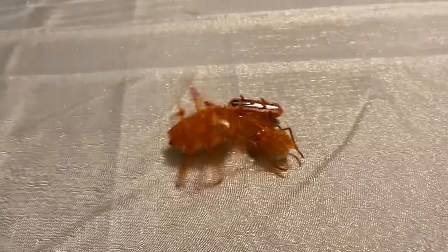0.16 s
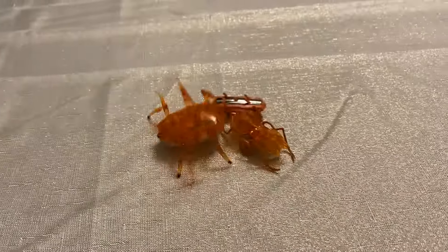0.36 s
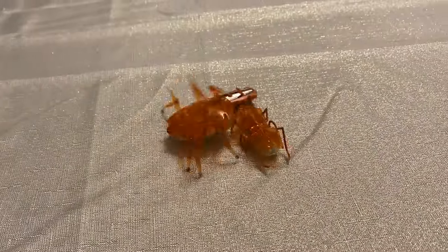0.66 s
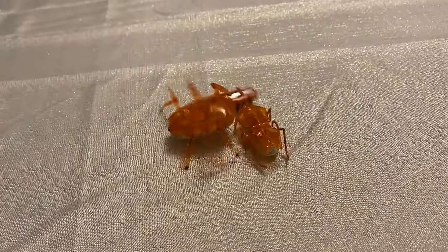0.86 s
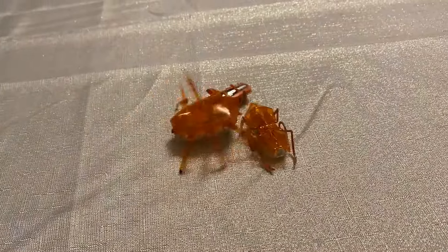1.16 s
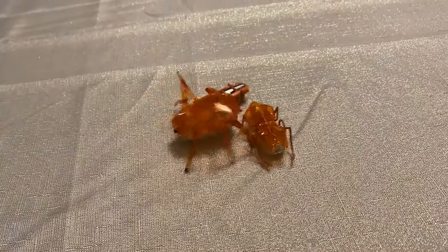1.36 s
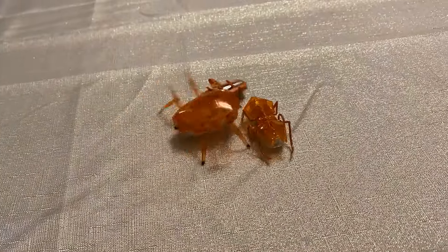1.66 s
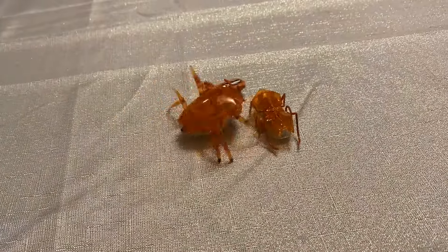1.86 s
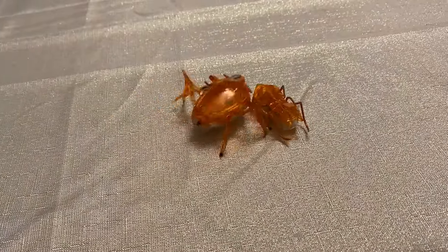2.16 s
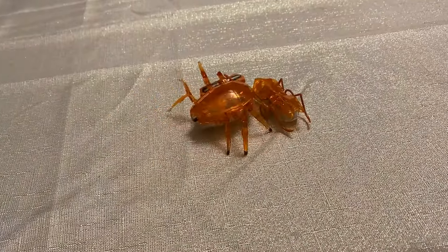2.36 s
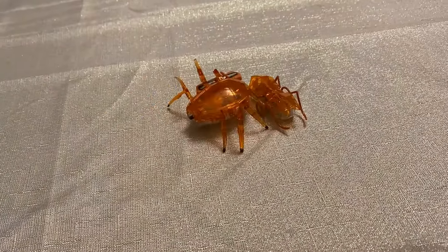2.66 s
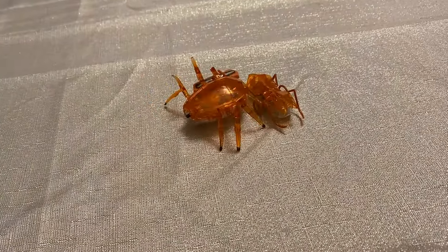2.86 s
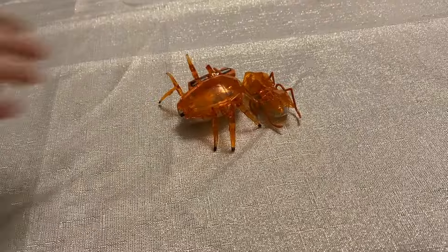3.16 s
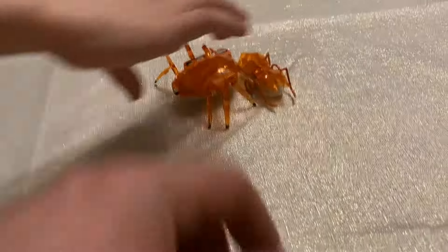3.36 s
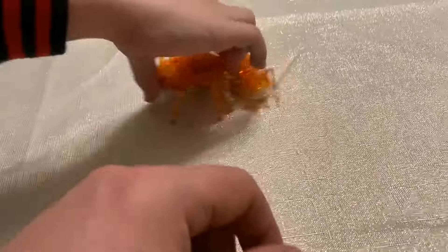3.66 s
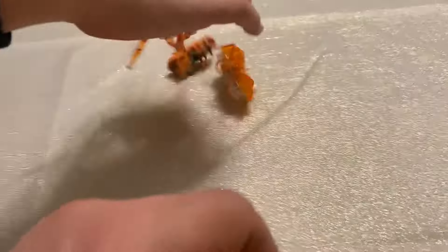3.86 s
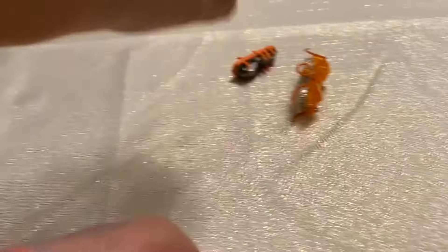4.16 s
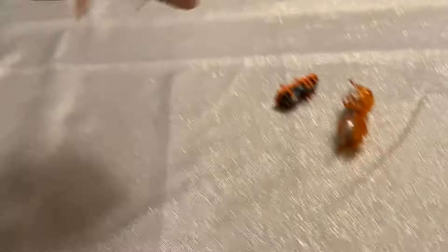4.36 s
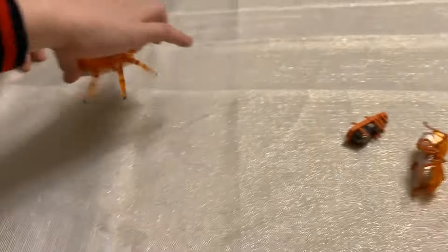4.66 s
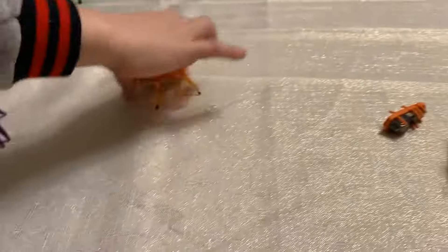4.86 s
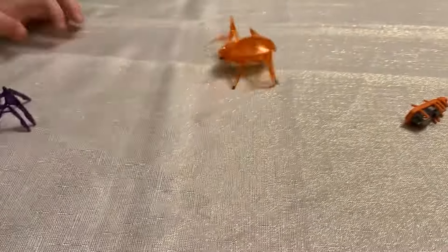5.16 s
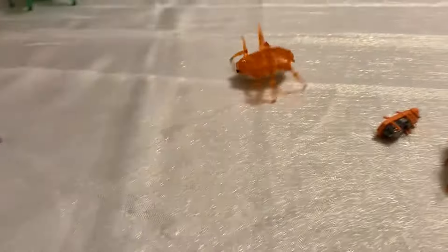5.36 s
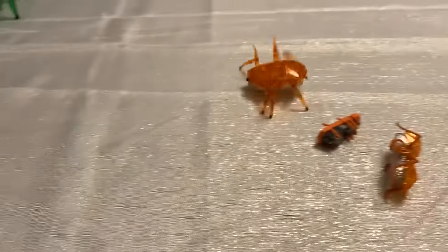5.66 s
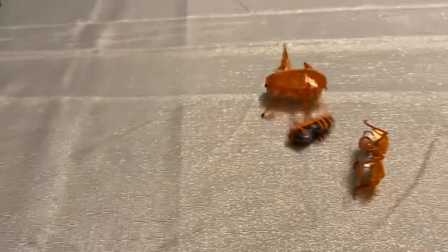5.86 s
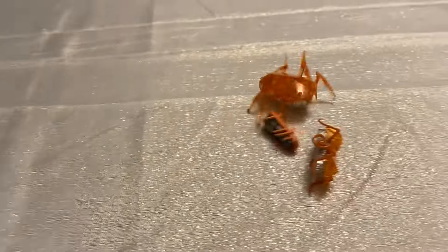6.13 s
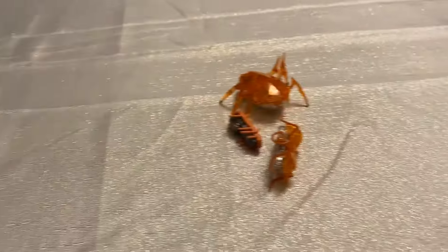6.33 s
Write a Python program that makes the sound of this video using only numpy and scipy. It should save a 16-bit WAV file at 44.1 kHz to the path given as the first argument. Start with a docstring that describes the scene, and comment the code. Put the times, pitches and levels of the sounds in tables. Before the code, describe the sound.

A small motorized toy bug rasps and buzzes on a cloth-covered table, feet pattering and plastic ticking. The buzz stops; only faint fabric rustle and dull breathy noise remain. A hand clacks the toy, it starts again with a thin wavering squeal while lifted, is set down tapping steadily, then clicks off. Close handheld microphone, small room.

```python
"""Toy robot bug on a table

A toy robot bug walks over a cloth-covered table and pushes against another toy: noisy tooth scrapes make the
rasp of its plastic gears, noise snaps ring its shell, and taps ring the modes of the board.
It stops, a hand knocks it while picking it up, it runs in the air with a thin squeal of the axle (a gliding
resonance), walks again and clicks off. Fabric swishes, a faint dull breathy noise fills the pause, and a
hand-held camera rumbles softly in a small room."""
import sys
import numpy as np
from scipy import signal
from scipy.fft import rfft, irfft, next_fast_len
from scipy.io import wavfile
from scipy.ndimage import uniform_filter1d, map_coordinates

SR = 44100
rng = np.random.default_rng(int(sys.argv[2]) if len(sys.argv) > 2 else 0)


def store_pcm(level_fs):
    """Save levels as 16-bit WAV."""
    pcm = np.round(np.clip(level_fs, -1, 1) * 32767).astype(np.int16)
    wavfile.write(sys.argv[1], SR, np.atleast_2d(pcm).T)


N = 286297
TIME = np.arange(N) / SR
TOP_HZ = 15900  # nothing sounds above this

# Levels in the tables come before the trims in the functions; spectra and modes give relative levels.

# effort of the gear train, one list a run: (t/s, rasp level/dB, tooth sizzle level/dB)
GEAR_RUNS = [
    [(0.0, -49, -44.5), (0.2, -52.5, -48.5), (0.62, -50.5, -45.5), (0.8, -52.5, -46.5), (1.15, -53, -50),
     (1.7, -54, -48.5), (2.1, -53.5, -48.5), (2.305, -54, -50)],
    [(3.698, -57, -53), (3.8, -56, -51), (4.1, -59.5, -50.5), (4.4, -56, -50.5), (4.6, -54.5, -48),
     (4.79, -52.5, -54), (4.85, -55, -52.5), (4.97, -54.5, -52.5), (5.7, -54, -52.5), (6.121, -53.5, -53.5)],
]
# colour of the gear rasp and of the fine tooth sizzle: (f/Hz, level/dB per Hz)
RASP_COLOUR = [(150, -3.5), (400, 0.5), (700, -3.5), (920, -0.5), (1150, -0.5), (1400, -0.5), (1980, 1.6),
               (2270, -6), (2650, -4.5), (3100, 2), (4300, 0), (6200, 0), (7300, 2), (8300, -4.5),
               (10000, -56), (16000, -32)]
SIZZLE_COLOUR = [(3000, -40.5), (6000, -40), (7300, -5), (8500, -0.5), (10400, 4.5), (11400, 7),
                 (12400, 3.5), (14500, 3.5), (15800, 0)]
# main body resonance, shifting as the hand grips and turns the toy: (t/s, f/Hz, level/dB)
HOLLOW_BODY = [(0, 3790, -60), (2.3, 3680, -64), (3.75, 3720, -66), (3.97, 3350, -49.5), (4.08, 3670, -61),
               (4.2, 3550, -58.5), (4.31, 3690, -47), (4.42, 3794, -62.5), (4.55, 3530, -55.5),
               (4.72, 3860, -57), (4.85, 3650, -70), (4.97, 3550, -59.5), (5.8, 3610, -60),
               (6.1, 3400, -55)]
# legs ringing along while the toy stands on the table: (t/s, level/dB re rasp)
STANDING_LEGS = [(0, -20), (1.0, -20), (2.3, -14), (3.7, -45), (4.75, -34), (4.95, -10), (5.5, -11.5),
                 (6.1, -11.5)]
LEG_RING_HZ = 1836
# shell mode, muted until the toy is pulled free of the other: (t/s, level/dB re rasp)
FREE_SHELL = [(3.8, -38), (4.9, -14.5)]
FREE_SHELL_HZ = 2450
# a leg slips free of the other toy and unloads the gears: (t/s, depth/dB)
LEG_SLIPS = [(0.708, 6.5), (0.893, 2), (1.106, 6), (1.335, 4), (1.533, 3), (1.739, 13.5), (1.946, 9),
             (2.178, 9.5)]
SLIP_DROP_S, SLIP_RELOAD_S = 0.012, 0.055  # quick fall of the load, slower rebuild
# gears easing after a footfall: delay, depth, half width
SLACK_AFTER_STEP_S, STEP_SLACK_DB, STEP_SLACK_S = 0.081, 2, 0.013
FULL_STEP_DB = -45  # a footfall that carries the whole toy
# squeals of the dry axle in the air: (t/s, length/s, level/dB, first f/Hz, last f/Hz)
AXLE_SQUEALS = [(3.766, 0.083, -56, 7540, 6800), (3.893, 0.084, -46.5, 7400, 7540),
                (4.005, 0.077, -47, 6900, 6660), (4.072, 0.096, -42, 7660, 7100),
                (4.207, 0.062, -42.5, 7760, 7600), (4.335, 0.14, -46, 6960, 7800),
                (4.47, 0.11, -43.5, 6860, 7760), (4.606, 0.12, -42.5, 7070, 7900),
                (4.885, 0.028, -47, 7350, 7300)]
SQUEAL_FADE_S = 0.033  # attack and release
# axle rubbing on between squeals, less once the feet carry the toy: (t/s, level/dB)
AXLE_RUB = [(3.762, -46), (3.93, -48), (4.3, -48.5), (4.77, -44.5), (4.86, -53.5), (5.25, -48.5),
            (5.5, -53), (6.121, -53)]
AXLE_RUB_HZ = 7090
# feet and body knocking on the table:
# (t/s, peak level/dB, scuff level/dB, chatter level/dB, second foot delay/s, its level/dB re the first)
FOOT_TAPS = [(0.012, -37.5, -2, -22.5, 0.013, -4), (0.151, -37, 0, -22.5, 0.01, 0),
             (0.298, -40.5, 6, -13.5, 0.017, 1), (0.443, -33.5, 7, -24, 0.013, 2.5),
             (0.609, -36.5, 2, -25, 0.008, 0), (0.794, -44, -2, -22, 0.01, 1),
             (1.895, -49.5, 3, -29, 0.011, 3), (2.08, -51.5, 18, -31, 0.0078, -1),
             (3.821, -37, 4, -26, 0.008, -0.5), (3.874, -41.5, -16, -21.5, 0.007, -1),
             (4.769, -36.5, 9, -26, 0.017, 5.5), (4.938, -29.5, -23, -32, 0.007, -16),
             (5.074, -31.5, -8, -31, 0.0069, -15), (5.209, -32, -1, -30.5, 0.012, -10),
             (5.346, -38.5, -6, -25, 0.0093, -6), (5.62, -38, -12, -20.5, 0.009, 3),
             (5.754, -37, 0, -24, 0.011, -1), (5.894, -32.5, 2.5, -29.5, 0.011, -4),
             (6.063, -42.5, -6, -22, 0.0085, -1.5)]
# modes of the table board: (f/Hz, width/Hz, level/dB)
BOARD_MODES = [(173, 123, -10), (270, 77, -3), (404, 29, 2.5), (532.4, 36.5, 3), (621, 92, -3),
               (877, 260, -3.5), (1190, 200, -17)]
# scuff of a foot: (f/Hz, level/dB per Hz)
SCUFF_COLOUR = [(700, -5), (1300, 10.5), (1900, -4.5), (2350, -2), (2800, -8), (4000, -2), (8000, -55)]
# loudest snaps of the plastic legs and the switch: (t/s, shell level/dB, edge level/dB)
PLASTIC_TICKS = [(0.032, -43, -45.5), (0.1127, -56, -33.5), (0.157, -38.5, -48), (0.2043, -38, -47),
                 (0.2107, -38, -41.5), (0.24, -46, -50), (0.2515, -43, -35), (0.272, -44, -49),
                 (0.428, -35, -35.5), (0.592, -44.5, -39), (0.8887, -55.5, -34), (0.95, -46, -55),
                 (1.0271, -43, -52), (1.1048, -48, -38), (1.526, -38.5, -42), (1.7296, -44, -43),
                 (1.939, -51, -37.5), (2.1739, -39.5, -40), (2.28, -50, -52), (3.0842, -66, -71),
                 (3.359, -68.5, -80), (3.465, -59, -59.5), (3.4746, -51, -56), (3.483, -62, -67),
                 (3.681, -46, -65), (3.762, -52, -37), (3.766, -41, -32.5), (3.769, -42, -35),
                 (3.8056, -46, -48.5), (3.82, -38, -27), (3.827, -37, -37), (3.8556, -40, -50),
                 (4.1497, -41.5, -58), (4.203, -48, -34.5), (4.2221, -44.5, -40), (4.313, -41.5, -41),
                 (4.409, -38.5, -39.5), (4.4453, -44, -44), (4.5448, -43, -45), (4.652, -53, -42),
                 (4.7057, -52, -38), (4.737, -41, -34), (4.788, -38, -59), (5.033, -49.5, -39),
                 (5.167, -55, -44), (5.303, -58, -36.5), (5.441, -52, -37), (5.7108, -53, -36.5),
                 (6.129, -34.5, -27.5), (6.1763, -46, -62)]
# modes of the plastic shell: (f/Hz, width/Hz, level/dB)
SHELL_MODES = [(2070, 190, -7), (3300, 255, -34.5), (3860, 300, -3), (4830, 1100, -3.5)]
# shell scraping against fingers and the other toy: (t/s, length/s, level/dB)
SHELL_SCRAPES = [(2.27, 0.034, -50.5), (3.43, 0.024, -77), (3.455, 0.04, -68), (3.541, 0.03, -57),
                 (3.575, 0.046, -51.5), (3.82, 0.075, -53)]
# modes of the scraped shell: (f/Hz, width/Hz, level/dB)
SCRAPED_MODES = [(3320, 710, 1), (4040, 520, 2.5), (5400, 1200, -4.5), (7400, 1200, -8)]
# hand bumping the toy against the table: (t/s, peak level/dB, hard upper modes level/dB re peak)
HAND_BUMPS = [(3.52, -32.5, 3.5), (3.544, -46, 18), (3.551, -40, 5), (3.56, -39, 10), (3.5665, -23, 0),
              (3.591, -36.5, 1), (3.606, -42, -11)]
# low and hard upper modes of a bump: (f/Hz, width/Hz, level/dB)
THUMP_MODES = [(200, 65, 1), (288, 127, 1), (563, 56, 10.5), (1170, 38, -1)]
CLACK_MODES = [(915, 250, -12), (1400, 400, -7), (1920, 350, -3), (2320, 125, 6), (3320, 330, -7.5)]
# sleeve, fingers and feet brushing over the cloth: (t/s, length/s, level/dB)
CLOTH_BRUSHES = [(2.58, 0.125, -71.5), (2.81, 0.089, -79), (3.018, 0.03, -77), (3.224, 0.078, -54.5),
                 (3.282, 0.12, -75), (3.446, 0.083, -61), (3.563, 0.057, -48.5), (4.752, 0.058, -44),
                 (5.16, 0.016, -41.5)]
# swish of fabric: (f/Hz, level/dB per Hz)
CLOTH_COLOUR = [(290, -32), (500, -2), (737, -1.5), (827, -8), (1060, -4.5), (1770, -0.5), (2760, -7),
                (15500, -8)]
# faint dull breathy noise in the pause: (t/s, level/dB)
PAUSE_NOISE = [(2.45, -86), (2.52, -70), (2.66, -74), (2.73, -104), (2.78, -99), (2.82, -68), (2.98, -79),
               (3.06, -67), (3.2, -68.5), (3.33, -65), (3.42, -85)]
# colour of the breathy noise: (f/Hz, level/dB per Hz)
PAUSE_COLOUR = [(200, 9), (700, 0.5), (1200, -3), (1900, 0), (2700, -3.5), (3400, -12), (8000, -17.5),
                (15000, -25)]
# steady unrest of the camera in the hand: (t/s, rumble level/dB, rub level/dB)
CAMERA_UNREST = [(0.0, -56, -54), (0.7, -59.5, -58), (1.1, -49.5, -52.5), (1.75, -59, -54.5),
                 (2.3, -66, -67), (2.55, -64, -61), (3.45, -61, -59.5), (4.0, -52.5, -51.5),
                 (4.25, -57.5, -57.5), (4.75, -60.5, -54), (5.0, -51.5, -49.5), (5.6, -54.5, -51),
                 (6.15, -48.5, -55.5), (6.25, -54.5, -56), (6.49, -52, -56.5)]
# camera jostled: (t/s, half width/s, rumble level/dB, rub level/dB)
CAMERA_JOSTLES = [(0.91, 0.084, -41, -47.5), (1.365, 0.021, -36.5, -42), (1.43, 0.091, -44, -42),
                  (1.73, 0.073, -53, -73), (2.5, 0.047, -55.5, -73), (2.901, 0.051, -47.5, -54),
                  (3.27, 0.044, -50.5, -52), (3.605, 0.074, -41.5, -39.5), (3.87, 0.052, -41.5, -43.5),
                  (6.0, 0.03, -42, -60.5), (6.09, 0.036, -57, -46.5)]
# colours of rumble, rub and room tone: (f/Hz, level/dB per Hz)
RUMBLE_COLOUR = [(20, -23), (35, -2), (50, 7.5), (72, 13), (105, 9), (150, -33), (300, -73)]
RUB_COLOUR = [(60, -31), (120, -0.5), (160, -5.5), (230, -8.5), (330, -13), (500, -23), (1200, -50.5)]
AIR_COLOUR = [(60, -9.5), (150, -13), (300, -13.5), (600, -16), (2000, -19.5), (4000, -39), (8000, -44),
              (15500, -70)]
# reverberation of the small room: (f/Hz, t60/s)
ROOM_T60 = [(150, 0.48), (600, 0.73), (3000, 0.53), (7000, 0.28), (15000, 0.076)]
# colour difference of the microphone pair: (f/Hz, left minus right level/dB)
PORT_DIFFERENCE = [(200, 0.5), (550, 0.5), (1000, -0.5), (1800, -4), (2500, 1), (3200, 8.5), (4000, 3),
                   (4800, 8), (6000, 4), (7300, 0), (8500, 0)]


def gears(wheel_hz=42.2, wheel_db=-0.94, catch_db=1.0, uneven_db=0.23, hollow_swing_db=1.0):
    """The teeth rasp through the body; an off-centre wheel presses them together once a turn."""
    wheel = np.sin(2 * np.pi * np.cumsum(wheel_hz * (1 + 0.063 * wobble(6.7))) / SR)
    mesh = teeth(mesh_hz=1284.4, scatter_db=2.5, scrape_s=0.00082, jitter=0.13)
    mesh = mesh * amp(wheel_db * wheel + catch_db * wobble(130))
    mesh = shifting(mesh, patchy_db=2.6)

    flutter_db = 2.6 * wobble(30)
    leg_ring = moving_ring(mesh, LEG_RING_HZ + 16 * wobble(27), half_width_hz=62)
    legs = amp(curves(STANDING_LEGS)[0] + flutter_db) * leg_ring
    shell_ring = moving_ring(mesh, FREE_SHELL_HZ + 60 * wobble(29), half_width_hz=490)
    shell = amp(curves(FREE_SHELL)[0]) * shell_ring
    bursts_db = 1.1 * wobble(110)
    rasp = amp(bursts_db) * (coloured(mesh, RASP_COLOUR) + legs + shell)
    sizzle = coloured(mesh, SIZZLE_COLOUR)

    centre_hz, hollow_db = curves(HOLLOW_BODY)
    hollow_gain = amp(hollow_db + hollow_swing_db * wobble(23))
    hollow = hollow_gain * moving_ring(mesh, centre_hz + 50 * wobble(25), half_width_hz=590)
    out = np.zeros(N)
    for run in GEAR_RUNS:
        rasp_db, sizzle_db = curves(run)
        out += running(run) * (amp(rasp_db + 2.0) * rasp + amp(sizzle_db) * sizzle + hollow)
    return out * amp(uneven_db * wobble(22) - slack())


def teeth(mesh_hz, scatter_db, scrape_s, jitter):
    """Each meeting of two gear teeth is a tiny scrape of uneven size and timing."""
    turns = np.cumsum(mesh_hz * (1 + .03 * wobble(7))) / SR
    at = np.flatnonzero(np.diff(np.floor(turns)))
    chance = rng.standard_normal((len(at), 2))
    at = np.clip(at + chance[:, 0] * jitter * SR / mesh_hz, 0, N - 1).astype(int)
    blows = np.bincount(at, amp(scatter_db * chance[:, 1]) ** 2, N)
    energy = signal.lfilter([1], [1, -np.exp(-1 / (scrape_s * SR))], blows)
    return unit(np.sqrt(energy) * rng.standard_normal(N))


def slack():
    """dB by which the gears ease after each footfall (less if light) and when a leg slips free."""
    walking, blocked = 0, 0
    for s, db, *_ in FOOT_TAPS:
        weight = min(amp(db - FULL_STEP_DB), 1)
        walking = walking + weight * swell(s + SLACK_AFTER_STEP_S, STEP_SLACK_S)
    for s, db in LEG_SLIPS:
        drop = np.clip((TIME - s) / SLIP_DROP_S, 0, 1)
        blocked = blocked + db * drop * swell(s, SLIP_RELOAD_S)
    return STEP_SLACK_DB * walking + blocked


def backlash(knock_hz=88, depth_db=1.0):
    """Gain of the mechanism: unloaded in the air, the gears rattle to and fro in their play."""
    turns = np.cumsum(knock_hz * (1 + 0.216 * wobble(60))) / SR
    aloft = np.interp(TIME, [3.76, 3.84, 4.75, 4.8], [0, 1, 1, 0])
    rattle = np.sin(2 * np.pi * turns) + np.sin(4 * np.pi * turns) / 3
    return amp(depth_db * aloft * (rattle - 1.0))


def axle(half_width_hz=400, gain_db=-4.0, waver_hz=90, rub_half_width_hz=600):
    """Quick uneven slips excite a squeal; each burst glides as the load changes."""
    slips = teeth(mesh_hz=317.5, scatter_db=1.0, scrape_s=0.0011, jitter=0.2)
    waver = waver_hz * wobble(40)
    rub_gain = running(AXLE_RUB) * amp(curves(AXLE_RUB)[0] + 1.2 * wobble(25))
    rub = rub_gain * moving_ring(slips, AXLE_RUB_HZ + waver, rub_half_width_hz)
    level, centre_hz = np.zeros(N), np.full(N, float(AXLE_RUB_HZ))
    for s, length, db, first_hz, last_hz in AXLE_SQUEALS:
        start, end = s - SQUEAL_FADE_S / 2, s + length + SQUEAL_FADE_S / 2
        level += amp(db) * np.clip(np.minimum(TIME - start, end - TIME) / SQUEAL_FADE_S, 0, 1)
        glide_hz = np.interp(TIME, [s, s + length], [first_hz, last_hz])
        centre_hz = np.where(TIME > start, glide_hz, centre_hz)
    squeal = level * shifting(moving_ring(slips, centre_hz + waver, half_width_hz), patchy_db=6.0)
    return amp(gain_db) * (rub + squeal)


def taps(chatter_t60=0.24, chatter_rise_s=0.0044, chatter_swing_db=3.5, bounce_db=-5, bounce_s=.032,
         place=0.011, thud_db=-15.5):
    """Two feet land and bounce, then the toy chatters; each spot of the table rings a little differently."""
    out, t = np.zeros(N), np.arange(SR // 4) / SR
    for s, db, scuff_db, chatter_db, second_s, second_db in FOOT_TAPS:
        chatter = amp(chatter_db + 4.5 - 60 * t / chatter_t60) * (1 - np.exp(-t / chatter_rise_s))
        chatter *= rng.standard_normal(len(t))
        # the chatter comes in bursts, about one a bounce
        chatter *= amp(chatter_swing_db * np.cos(2 * np.pi * t * rng.uniform(0.89, 1.15) / bounce_s))
        chatter[int(bounce_s * rng.uniform(.75, 1.15) * SR)] += amp(bounce_db)
        blow = softened(chatter, hz=647)
        blow[round(.002 * SR)] += 1
        blow[round((.002 + second_s) * SR)] += amp(second_db)

        wood = ring(blow, detuned(BOARD_MODES, place))
        thud = ring(blow, [(113.0, 7.9, 0)])
        scuff_shape = amp(-60 * t / 0.044) * (1 - np.exp(-t / 0.0024))
        scuff = coloured(scuff_shape * rng.standard_normal(len(t)), SCUFF_COLOUR)
        for part, level in [(wood, 1), (thud, thud_db), (scuff, scuff_db - 8.0)]:
            add(out, s, amp(db + level) * part / np.abs(part).max())
    return out


def ticks(snap_t60=0.018, rise_s=0.00069, ring_db=1.5):
    """Hard plastic snaps: shell modes, a bright ring and a sharp edge."""
    out, t = np.zeros(N), np.arange(SR // 16) / SR
    since = t - .003  # leaves room for a short fade-in before the snap
    shape = np.where(since < 0, np.exp(-np.abs(since) / rise_s), amp(-60 * np.abs(since) / snap_t60))
    for s, shell_db, edge_db in PLASTIC_TICKS:
        snap = shape * rng.standard_normal(len(t))
        shell = ring(snap, SHELL_MODES)
        bright = ring(snap, [(8430, 1900, 0)])
        edge = ring(snap, [(9500, 5700, 0.3), (14300, 8300, -1)])
        for part, db in [(shell, shell_db), (bright, shell_db + ring_db), (edge, edge_db)]:
            add(out, s - .002, amp(db - 17.5) * unit(part))
    return out


def scrapes():
    """Plastic rubbing on plastic sticks and slips in a dense crunch that rings the shell."""
    return strokes(SHELL_SCRAPES) * unit(ring(contacts(N, per_s=1100), SCRAPED_MODES))


def bumps(rattle_db=-39, rattle_t60=0.056, grip=0.025, clatter_db=-21, clatter_t60=0.048):
    """Each bump rings a low thump and clatters the loose plastic; the changing grip detunes both."""
    out, t = np.zeros(N), np.arange(SR // 4) / SR
    for s, db, hard_db in HAND_BUMPS:
        blow = amp(rattle_db - 60 * t / rattle_t60) * rng.standard_normal(len(t))
        blow[0] += 1
        clatter = blow + amp(clatter_db - 60 * t / clatter_t60) * contacts(len(t), per_s=700)
        layers = [(blow, THUMP_MODES, 0), (softened(clatter, hz=4500), CLACK_MODES, hard_db - 9.0)]
        for push, modes, level in layers:
            part = ring(push, detuned(modes, grip))
            add(out, s, amp(db + level) * part / np.abs(part).max())
    return out


def brushes():
    """Short soft swishes of fabric: coloured noise with a finely uneven level."""
    swish = coloured(rng.standard_normal(N) * amp(1.2 * wobble(600)), CLOTH_COLOUR)
    return strokes(CLOTH_BRUSHES) * swish


def pause_noise():
    """A faint dull breathy noise in the pause: noise and sparse grains with a shifting colour."""
    waver_db = 2 * wobble(25)
    grainy = shifting(rng.standard_normal(N) + contacts(N, per_s=500), patchy_db=3.5)
    gain = running(PAUSE_NOISE) * amp(curves(PAUSE_NOISE)[0] + waver_db)
    return gain * coloured(grainy, PAUSE_COLOUR)


def table_echo(x, gain_db=-8, delay_s=0.001703):
    """The cloth-covered table throws the sound back dully from one side, which widens it."""
    delayed = filtered(x, lambda hz: np.exp(-2j * np.pi * hz * delay_s))
    return amp(gain_db) * np.array([[1], [-1]]) * softened(delayed, hz=4940)


def room(x, count=14):
    """A diffuse tail, different at each microphone, redrawn at regular intervals and crossfaded."""
    out, step = np.zeros((2, N)), N // count + 1
    for start in range(-step, N, step):
        first = max(start, 0)
        piece = x[first:start + 2 * step]
        # overlapping sine windows crossfade one tail into the next
        piece = piece * np.sin(np.pi / 2 * (np.arange(len(piece)) + first - start) / step)
        hz, t, z = signal.stft(rng.standard_normal((2, SR // 2)), SR, nperseg=256)
        decay = amp(-60 * t / along(ROOM_T60, hz)[:, None])
        tail = signal.istft(z * decay, SR, nperseg=256)[1]
        for track, side in zip(out, tail):
            add(track, first / SR + .004, signal.fftconvolve(piece, side / np.linalg.norm(side)))
    return out


def background(unrest_db=2.0):
    """Rumble of the hand-held camera, swelling when it is jostled, over quiet room tone."""
    rumble, rub = (amp(db + unrest_db * wobble(9.8)) for db in curves(CAMERA_UNREST))
    for s, half_width, rumble_db, rub_db in CAMERA_JOSTLES:
        rumble = np.hypot(rumble, amp(rumble_db) * swell(s, half_width))
        rub = np.hypot(rub, amp(rub_db) * swell(s, half_width))
    camera = rumble * wide_noise(RUMBLE_COLOUR, side_db=-22.5) + rub * wide_noise(RUB_COLOUR, side_db=-10.5)
    air = amp(-75.0 + 0.74 * wobble(5.3)) * wide_noise(AIR_COLOUR, side_db=5.5)
    return amp(-2.5) * camera + air


def amp(db):
    """Decibels to gain."""
    return 10 ** (np.asarray(db) / 20)


def unit(x):
    """Scale to rms 1."""
    return x / np.sqrt(np.mean(x ** 2) + 1e-20)


def along(points, hz):
    """(f/Hz, value) points read on a log axis."""
    f, v = np.transpose(points)
    return np.interp(np.log(hz + 1), np.log(f), v)


def curves(rows):
    """One value per sample for each column after the time."""
    s, *cols = np.transpose(rows)
    return [np.interp(TIME, s, c) for c in cols]


def running(rows, fade=0.016):
    """1 from the first row to the last, with short fades."""
    first, last = rows[0][0], rows[-1][0]
    return np.interp(TIME, [first - fade, first, last, last + fade], [0, 1, 1, 0])


def strokes(rows):
    """Gain of (t/s, length/s, level/dB) strokes that rise, hold and fall."""
    gain = np.zeros(N)
    for s, length, db in rows:
        corners = [s, s + length / 4, s + length * 3 / 4, s + length]
        gain += amp(db) * np.interp(TIME, corners, [0, 1, 1, 0])
    return gain


def swell(s, half_width):
    """A bell of height 1 around time s, down to 1/e at the half width."""
    return np.exp(-((TIME - s) / half_width) ** 2)


def wobble(rate):
    """A smooth random curve, rate knots a second."""
    return map_coordinates(rng.standard_normal(int(N * rate / SR) + 4), [TIME * rate])


def contacts(size, per_s):
    """Tiny contacts of uneven strength at random moments, at rms 1."""
    return unit((rng.random(size) < per_s / SR) * rng.standard_normal(size))


def filtered(x, response):
    """x times a complex response of frequency."""
    n = x.shape[-1]
    m = next_fast_len(n + 8192)  # spare room keeps the end from wrapping onto the start
    return irfft(rfft(x, m) * response(np.fft.rfftfreq(m, 1 / SR)), m)[..., :n]


def coloured(x, spectrum):
    """x shaped by (f/Hz, level/dB) points, at rms 1."""
    return unit(filtered(x, lambda hz: amp(along(spectrum, hz))))


def softened(x, hz):
    """A soft contact: two-pole low-pass."""
    return filtered(x, lambda f: 1 / (1 + 1j * f / hz) ** 2)


def ring(x, modes):
    """x through (f/Hz, width/Hz, level/dB) resonances of alternating polarity."""
    def response(f):
        total = 0
        for k, (centre, width, db) in enumerate(modes):
            damping = 1j * f * width
            total = total + (-1) ** k * amp(db) * damping / (centre * centre - f * f + damping)
        return total
    return filtered(x, response)


def detuned(modes, spread):
    """The modes as one blow finds them: each slightly moved, and louder or softer by chance."""
    return [(hz * (1 + spread * rng.uniform(-1.15, 1)), width, db + 2 * rng.standard_normal())
            for hz, width, db in modes]


def moving_ring(x, centre_hz, half_width_hz):
    """A noisy excitation x narrowed to a band around a gliding centre, at rms 1."""
    turn = np.exp(2j * np.pi * np.cumsum(centre_hz) / SR)
    pole = np.exp(-2 * np.pi * half_width_hz / SR)
    # shift the centre down to 0 Hz, low-pass there, shift back up
    return unit(np.real(turn * signal.lfilter([1], np.poly([pole, pole]), x / turn)))


def shifting(x, patchy_db):
    """Small patches of the spectrum swell and fade at random."""
    z = signal.stft(x, nperseg=512)[2]
    field = uniform_filter1d(rng.standard_normal(z.shape), size=3, axis=0)
    field = uniform_filter1d(field, size=7, axis=1)
    return unit(signal.istft(z * amp(patchy_db * unit(field)), nperseg=512)[1][:N])


def wide_noise(spectrum, side_db):
    """Stereo noise: a mid of rms about 1 and an independent side at side_db relative to it."""
    mid, side = coloured(rng.standard_normal((2, N)), spectrum)
    return np.array([mid + amp(side_db) * side, mid - amp(side_db) * side])


def add(track, s, sound):
    """Mix a sound in at time s."""
    part = track[max(round(s * SR), 0):][:len(sound)]
    part += sound[:len(part)]


def scene():
    """Toy and hand are close in front of the camera; the room answers softly."""
    motor = (gears() + axle()) * backlash()
    knocks = taps()
    details = ticks() + brushes() + pause_noise() + scrapes()
    grab = bumps()
    echo = room(amp(-5) * motor + amp(-9.0) * knocks + amp(-8.0) * grab + amp(-10.5) * details)
    grab_on_left = grab * amp([[2.5], [-2.5]])
    return motor + knocks + details + grab_on_left + table_echo(motor + knocks) + echo + background()


def record(dry, treble_side_db=-2):
    """The two microphones differ in colour; the treble is slightly narrowed and lags on the left."""
    mid = dry.mean(0)
    side = filtered((dry[0] - dry[1]) / 2, lambda hz: amp(treble_side_db * np.clip(hz / 6800, 0, 1) ** 4))
    lag = lambda hz: np.exp(-2j * np.pi * np.maximum(hz - 6900, 0) * .000235)  # seconds, above 6900 Hz
    left = filtered(mid + side, lambda hz: amp(along(PORT_DIFFERENCE, hz) / 2) * lag(hz))
    right = filtered(mid - side, lambda hz: amp(-along(PORT_DIFFERENCE, hz) / 2))
    return filtered(np.array([left, right]), lambda hz: hz < TOP_HZ)


dry = scene()
out = record(dry)
store_pcm(out)
```